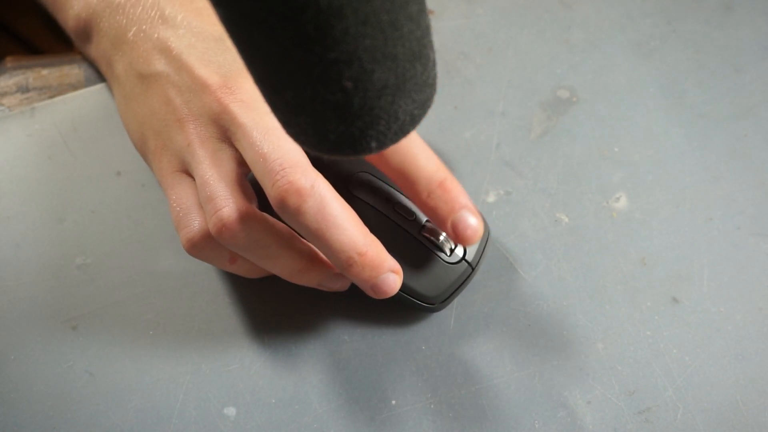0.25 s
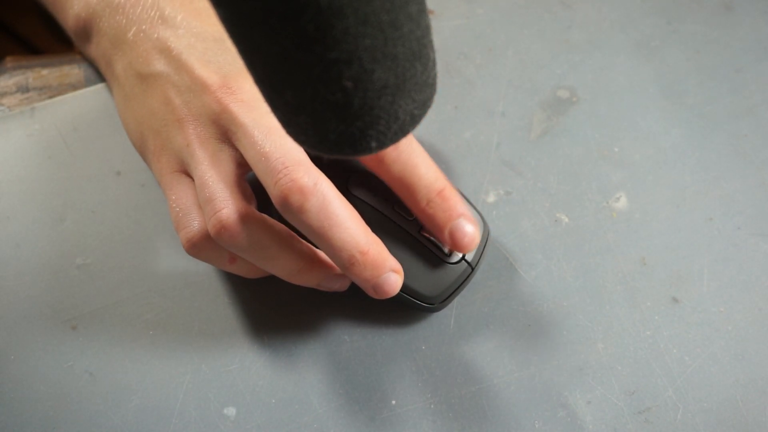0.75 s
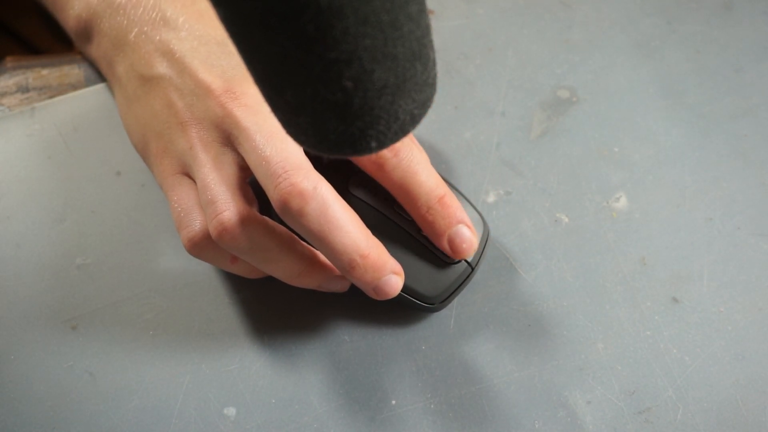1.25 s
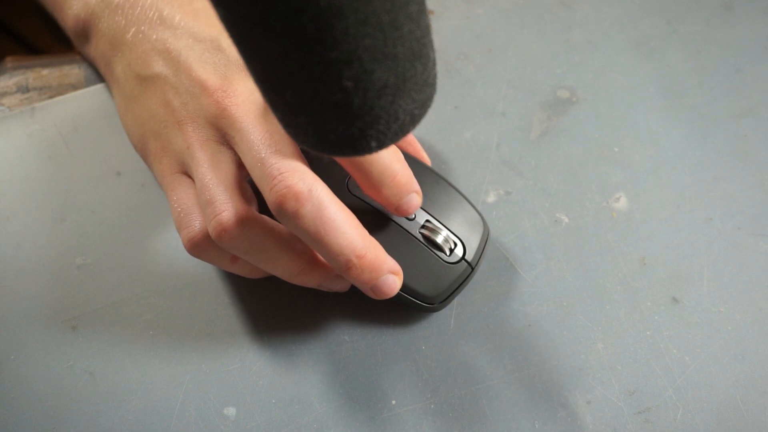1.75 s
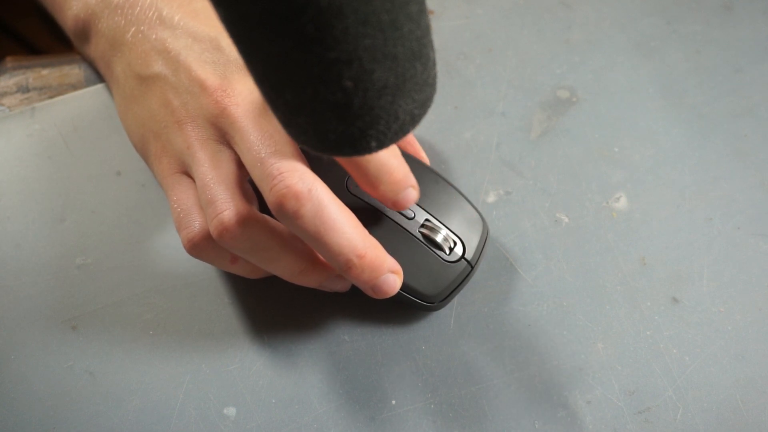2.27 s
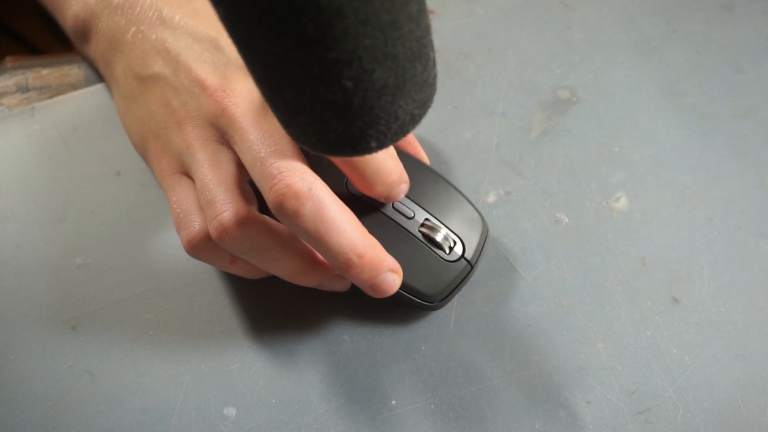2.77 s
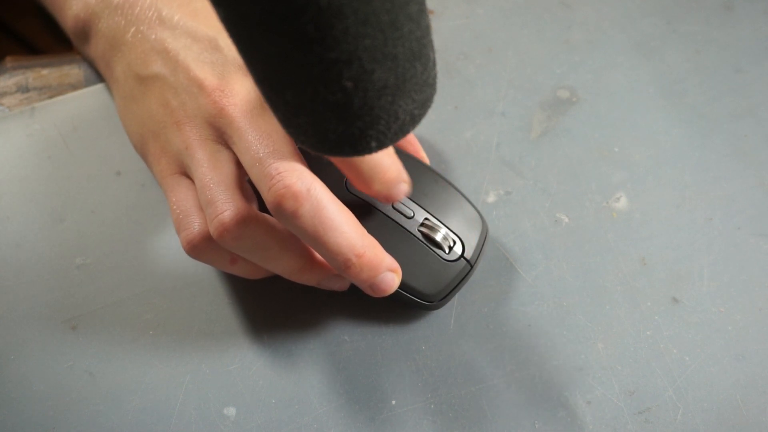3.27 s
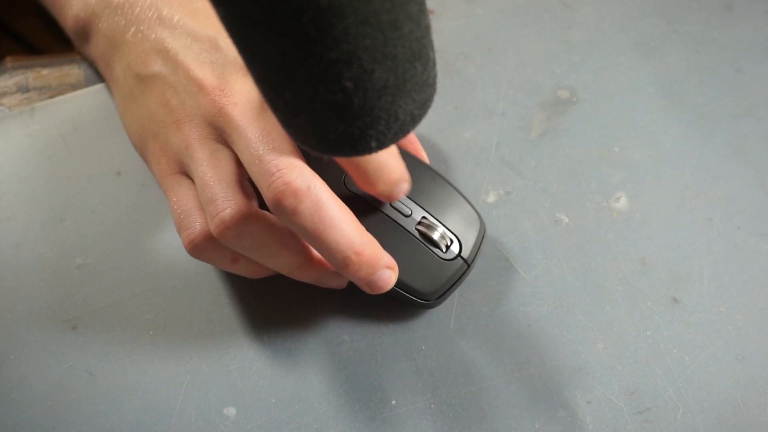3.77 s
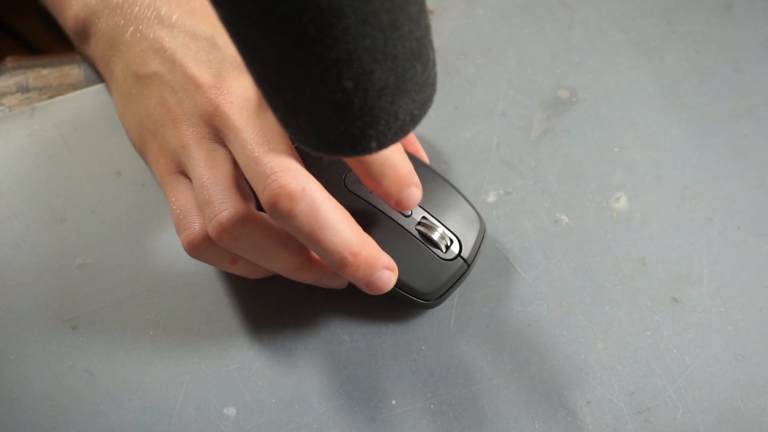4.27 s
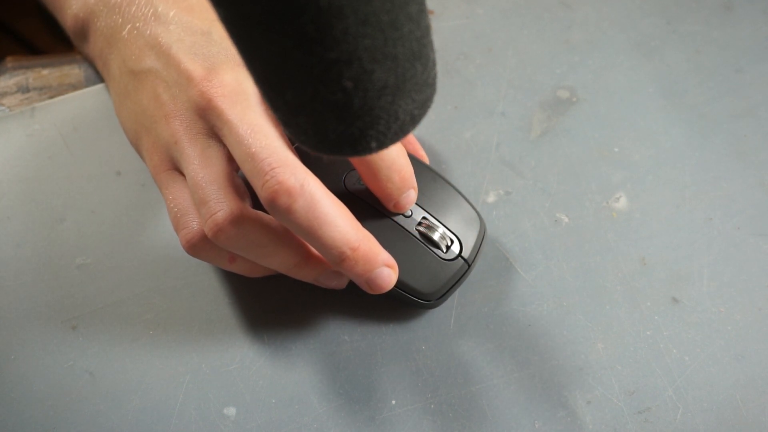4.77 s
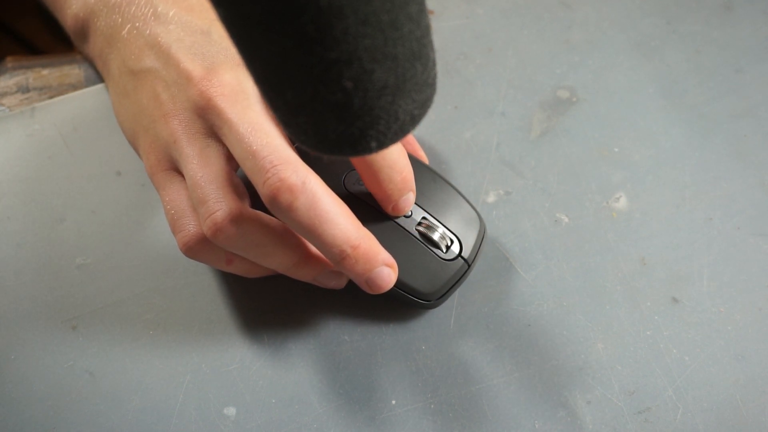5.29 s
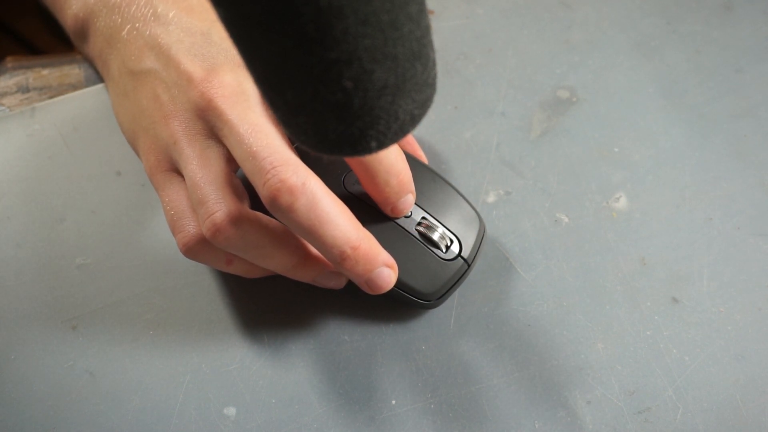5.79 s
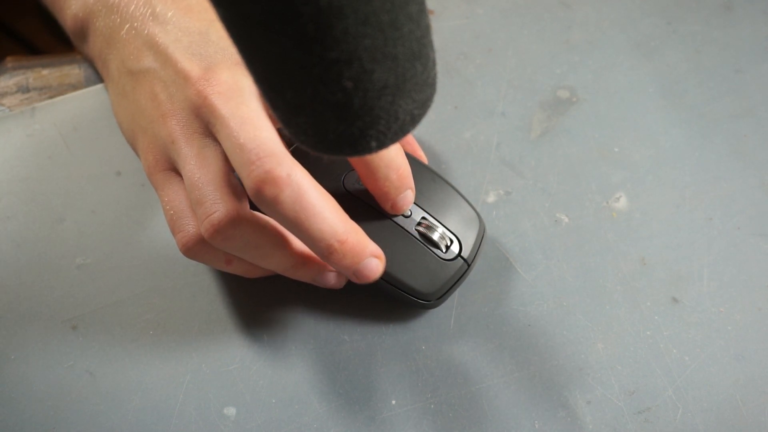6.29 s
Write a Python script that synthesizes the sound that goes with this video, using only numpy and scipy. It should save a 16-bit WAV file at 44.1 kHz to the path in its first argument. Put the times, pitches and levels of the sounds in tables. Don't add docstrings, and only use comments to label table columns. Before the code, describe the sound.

Fingers rustle and tap a plastic mouse on a hollow desk, wheel faintly squeaks, then five crisp button clicks, heard very close.

```python
import sys
import numpy as np
from scipy import signal
from scipy.fft import rfft, irfft
from scipy.io import wavfile
from scipy.ndimage import uniform_filter1d

SR = 44100
rng = np.random.default_rng(int(sys.argv[2]) if len(sys.argv) > 2 else 0)


def ratio(d):
    e = np.asarray(d, float) / 20
    return 10 ** e


def wrap_up_sound(samples):
    columns = np.atleast_2d(samples).T
    tamed = np.clip(columns, -1, 1)
    steps = np.round(tamed * 32767).astype(np.int16)
    wavfile.write(sys.argv[1], SR, steps)


N = 288414

# t/s, snap level/dB
CLICKS = [
    (4.6847, -32.5),
    (5.1499, -32.5),
    (5.521, -33),
    (5.8341, -34.5),
    (6.4042, -33),
]
# t/s, thud level/dB
RELEASES = [
    (4.8342, -30.5),
    (5.309, -30.5),
    (5.618, -30),
    (5.9395, -30),
]
# f/Hz, level/dB, t60/s
LEAF = [(4940, 13.5, 0.0076), (4560, -9, 0.022), (5156, 2, 0.015), (6430, -4, 0.013), (2820, -16, 0.029),
        (3800, -43, 0.024), (2050, -8.5, 0.01), (6350, -15, 0.0054)]
LEAF_SCATTER_DB = 1.5


def clock(seconds):
    return np.arange(int(seconds * SR)) / SR


def decay(t, t60):
    return np.exp(-np.log(1000) * t / t60)


def band(x, hz, width):
    return signal.lfilter(*signal.iirpeak(hz, hz / width, fs=SR), x)


def twice_band(x, hz, width):
    return band(band(x, hz, width), hz, width)


def unit(x):
    return x / np.abs(x).max()


def add(track, s, sound):
    i = int(s * SR)
    track[i:i + len(sound)] += sound[:N - i]


def ring(modes, chance, seconds, scatter_db, contact_ms, scale=1):
    t = clock(seconds)
    hz, db, t60 = np.transpose(modes)[:, :, None]
    db = db + scatter_db * chance[:len(modes), None]
    free = (ratio(db) * np.sin(2 * np.pi * hz * scale * t) * decay(t, t60)).sum(axis=0)
    push = np.sin(np.linspace(0, np.pi, max(int(contact_ms * SR / 1000), 1) + 2))
    return unit(signal.fftconvolve(free, push)[:len(t)])


def crack(lo_hz, hi_hz, decay_ms, bounce_db):
    t = 1000 * clock(.025)
    shape = np.exp(-t / decay_ms) + ratio(bounce_db) * np.exp(-t / 3.74)
    colour = signal.butter(2, [lo_hz, hi_hz], "band", fs=SR, output="sos")
    return shape * signal.sosfilt(colour, rng.standard_normal(len(t)))


def glide(table):
    s, *columns = np.transpose(table)
    start, end = s[0], s[-1]
    t = np.arange(start, end, 1 / SR)
    from_edge = np.minimum(t - start + (start < 1e-3), end - t)
    edge = np.clip(from_edge / min(.01, (end - start) / 12), 0, 1)
    return start, edge, [np.interp(t, s, c) for c in columns]


def hiss():
    # f/Hz, level/dB per Hz
    spectrum = [(15, -32.5), (25, 4.5), (68, 3.5), (108, -7), (818, -28.5), (1230, -27.5), (1610, -31),
                (14800, -30.5), (16000, -37)]
    hz, db = np.transpose(spectrum)
    f = np.fft.rfftfreq(N, 1 / SR) + 1
    x = irfft(rfft(rng.standard_normal(N)) * ratio(np.interp(np.log(f), np.log(hz), db)), N)
    return ratio(-69) * x / x.std()


def skin_rub():
    # t/s, length/s, level/dB, shell share level/dB
    rubs = [
        (0.0, 0.022, -58.5, -33),
        (0.038, 0.052, -78, -20),
        (0.438, 0.14, -66, -38),
        (0.525, 0.035, -71, -27),
        (0.8, 0.049, -71.5, -28),
        (0.888, 0.063, -69.5, -33),
        (1.01, .04, -78, -22),
        (1.871, 0.16, -67, -22),
        (4.266, 0.099, -72.5, -26),
    ]
    attack, start_db, fade_db = .3, 9, 14
    on_desk, on_shell = np.zeros(N), np.zeros(N)
    for s, seconds, db, shell_db in rubs:
        curve = [(s, db - start_db), (s + attack * seconds, db), (s + seconds, db - fade_db)]
        s, edge, (db,) = glide(curve)
        grain = edge * ratio(db) * rng.standard_normal(len(db))
        add(on_desk, s, grain)
        add(on_shell, s, grain * ratio(shell_db))
    dull = twice_band(on_desk, 170, 290)
    hollow = band(band(on_shell, 780, 700), 950, 560)
    return ratio(19) * dull + ratio(29.5) * hollow


def rocking():
    # peak t/s, level/dB, swell/s, t60/s
    swells = [
        (0.01, -38.5, .02, 0.39),
        (0.485, -39.5, 0.086, 0.25),
        (0.63, -59, 0.029, 0.37),
        (0.91, -41, .04, 0.14),
        (1.025, -55.5, 0.018, 0.39),
        (1.29, -61, 0.027, 0.04),
        (2.641, -54, 0.0414, 0.044),
    ]
    rock_hz, swell_db, hold_s = 58.5, 19.5, .04
    out = np.zeros(N)
    for s, db, swell, t60 in swells:
        start = max(s - swell, 0)
        curve = [(start, rock_hz, db - swell_db * (start > 0)), (s, rock_hz, db),
                 (s + hold_s, rock_hz, db - 4.0), (s + hold_s + t60 / 2, rock_hz, db - 31.5)]
        s, edge, (hz, db) = glide(curve)
        add(out, s, edge * ratio(db + 1.5) * np.sin(2 * np.pi * np.cumsum(hz) / SR))
    return out


def taps():
    # t/s, level/dB, f/Hz near the top of the band, length/ms
    nail_taps = [(0.046, -64, 4830, 5.4), (.159, -73, 2500, 1.5), (.54, -65.5, 4530, 2.5),
                 (0.659, -68, 1300, 1.5), (1.359, -70, 9000, 1.2), (1.384, -55, 2200, 3.7),
                 (2.192, -56, 2500, 4.5), (3.262, -53, 2070, 2.3), (4.434, -65, 3000, 1.3),
                 (4.457, -48.5, 3300, 0.64), (4.871, -61, 3220, 0.54), (4.872, -55.5, 1250, 2.9),
                 (5.206, -56, 2480, 1.2), (6.132, -66, 1350, 3.8), (6.268, -61, 2550, 1.9)]
    out = np.zeros(N)
    for s, db, hz, ms in nail_taps:
        add(out, s, ratio(db) * unit(crack(0.17 * hz, 1.1 * hz, 0.84 * ms, -14)))
    return out


def blows():
    # t/s, thud level/dB, boom level/dB, panel level/dB
    pushes = [(0.151, -56.5, -64, -60.5), (0.343, -61, -48.5, -68), (0.649, -51.5, -65, -62.5),
              (0.817, -68, -42.5, -58), (1.34, -50, -54, -56), (2.011, -31.5, -35.5, -37.5),
              (2.158, -48, -58, -38.5), (2.668, -46, -48, -41), (3.13, -42, -46.5, -40),
              (3.146, -59, -66, -38.5), (3.631, -36, -43, -47.5), (4.408, -51.5, -49, -57),
              (6.455, -42, -62, -48.5)]
    # t/s, thud level/dB, boom level/dB, panel level/dB
    jolts = [(0.994, -56, -68, -72), (1.321, -49, -68, -40.5), (1.345, -50, -57, -40.5),
             (1.871, -51.5, -57, -50.5), (2.006, -54, -42, -53), (2.167, -25, -51, -41),
             (2.173, -33, -64, -34.5), (2.19, -56, -65, -42.5), (3.552, -46, -41, -48),
             (3.604, -38, -68, -51), (4.238, -43.5, -65, -41.5), (4.243, -42.5, -55.5, -57),
             (5.201, -40, -55, -47.5), (6.268, -41, -53.5, -56.5)]
    # t/s, thud level/dB, boom level/dB, panel level/dB, contact/ms
    landings = [
        (1.3343, -28, -56, -40, 1.36),
        (1.3385, -29, -56, -52, 1.4),
        (3.1148, -26, -31, -43.5, 4.5),
    ]
    # t/s, thud level/dB, boom level/dB, panel level/dB
    lifts = [
        (2.674, -37, -44.5, -52),
        (3.12, -21.5, -35, -34),
        (3.593, -39, -39, -41.5),
        (3.954, -41.5, -43.5, -48.5),
    ]
    # panel tilt in dB per octave, contact in ms
    push_touch, jolt_touch, lift_touch = (-5.5, 2.85), (5.3, 3.23), (4.5, 2)
    click_touch, release_touch = (-1.4, 2.48), (-5, 2.7)
    landing_tilt_db = 1
    down, up = 0.98, -1.156
    rows = [(down, *row, *push_touch) for row in pushes]
    rows += [(down, *row, *jolt_touch) for row in jolts]
    rows += [(down, *row, landing_tilt_db, ms) for *row, ms in landings]
    rows += [(up, *row, *lift_touch) for row in lifts]
    rows += [(up, s, db + 2.5, db - 17.5, db - 8, *click_touch) for s, db in CLICKS]
    rows += [(up, s, db, db - 14.5, db - 9.5, *release_touch) for s, db in RELEASES]
    return rows


def tilted(modes, db_per_octave):
    return [(hz, db + db_per_octave * np.log2(hz / 200), t60) for hz, db, t60 in modes]


def desk():
    # f/Hz, level/dB, t60/s
    boom_modes = [(61, -5, 0.12), (58.4, -2, 0.41), (51.37, -9.5, 0.6), (70, -12.5, .12)]
    # f/Hz, level/dB, t60/s
    panel_modes = [(120, -0.5, 0.2), (151.4, -3.5, 0.31), (218.7, -4, 0.16), (258, -10.5, 0.29),
                   (295, -3.5, 0.18), (324, -10.5, 0.22), (423, 1.5, 0.084), (503, -9.5, 0.051),
                   (623, -43, 0.35), (780, -12, 0.082)]
    thud_modes = [(177, 3.5, 0.017), (359, -4.0, 0.0085)]
    out, t = np.zeros(N), clock(.35)
    wood = signal.butter(3, [110, 700], "band", fs=SR, output="sos")
    bass_cut = signal.butter(2, 45, "high", fs=SR, output="sos")
    every_blow = blows()
    chance = rng.standard_normal((len(every_blow), 11))
    for (sign, s, thud_db, boom_db, panel_db, tilt_db, ms), c in zip(every_blow, chance):
        thud = signal.sosfilt(bass_cut, ring(thud_modes, c, .06, 5.9, ms))
        boom = ring(boom_modes, c, 0.58, 0.99, ms, 1 + .02 * c[-1])
        panel = ring(tilted(panel_modes, tilt_db), c, .35, 1.13, 0.89 * ms, 1 + 0.021 * c[-1])
        rattle = unit(signal.sosfilt(wood, rng.standard_normal(len(t))) * decay(t, 0.25))
        add(out, s, sign * ratio(thud_db) * thud)
        add(out, s, sign * ratio(boom_db + 3) * boom)
        add(out, s + .003, sign * ratio(panel_db) * (panel + ratio(tilt_db - 21.5) * rattle))
    return out


def stroke(s, seconds, hz, rough, back, slow_hz, fade_db):
    slowing_s = .024
    rows = []
    for u in np.linspace(0, seconds, num=9):
        slip_hz = slow_hz + (hz - slow_hz) * np.exp(-(u / slowing_s) ** 2)
        rows.append((s + u, slip_hz, -fade_db * (u / seconds) ** 2, rough, back))
    return rows


def wheel_squeak():
    # t/s, length/s, pressure level/dB, first slip rate f/Hz
    squeaks = [
        (0.931, 0.084, -90, 1200),
        (2.568, .053, -86, 1300),
        (2.676, 0.052, -65.5, 1250),
        (3.6, 0.02, -65.5, 1230),
        (3.953, 0.065, -67, 1420),
    ]
    # roughness 0-1, back-slip share 0-1, final slip rate f/Hz, fade level/dB
    grips = [(.15, 0, 1240, 5), (.5, 0, 1250, 7), (.36, .7, 1300, 20), (.5, .4, 1100, 20), (.18, 0, 620, 8)]
    # f/Hz, width f/Hz, level/dB
    wheel_modes = [(1250, 174, -1), (3350, 700, -7), (4920, 410, -0.5), (6480, 560, -6), (8450, 840, -8.5),
                   (11830, 460, -7.5)]
    slips = np.zeros(N)
    for (s, seconds, press_db, first_hz), hold in zip(squeaks, grips):
        s, edge, (hz, db, rough, back) = glide(stroke(s, seconds, first_hz, *hold))
        wobble = uniform_filter1d(rng.standard_normal(len(hz)), size=40)
        cycle = np.cumsum(hz * (1 + 1.6 * rough * wobble)) / SR
        pulses = np.exp(-(cycle % 1) / 0.027) - back * np.exp(-((cycle + .5) % 1) / 0.017)
        grip = ratio(19 * uniform_filter1d(rng.standard_normal(len(hz)), size=150))
        scrape = 1.24 * rough * rng.standard_normal(len(hz))
        add(slips, s, edge * ratio(db + press_db) * grip * (6 * pulses + scrape))
    wheel = np.zeros(N)
    for k, (hz, width, db) in enumerate(wheel_modes):
        wheel += (-1) ** k * ratio(db) * band(slips, hz, width)
    return ratio(16.0) * wheel


def snaps():
    # t/s, snap level/dB, shell level/dB, shell f/Hz
    contacts = [
        (1.3352, -34, -44, 920),
        (1.3394, -31.5, -43.5, 1238),
        (2.178, -46.5, -52.5, 1180),
        (2.6685, -49.5, -53.5, 1050),
        (2.6765, -46.5, -57, 1160),
        (3.1192, -27, -38.5, 1111),
        (3.148, -63, -60, 1120),
        (3.5926, -45, -50.5, 1126),
        (4.4093, -55.5, -66.5, 1140),
        (6.2695, -58, -61, 1020),
    ]
    rows = [(s, db, shell_db, hz, db - 22.5, -15) for s, db, shell_db, hz in contacts]
    rows += [(s, db, db - 20.5, 1154, db - 26.5, -6.5) for s, db in CLICKS]
    return rows


def after_ring(t60):
    # f/Hz, width f/Hz, level/dB
    hollows = [(1250, 370, 2.5), (2490, 820, -3.5), (5180, 620, -19)]
    t = clock(.25)
    buzz = rng.standard_normal(len(t)) * decay(t, t60)
    return unit(sum(ratio(db) * twice_band(buzz, hz, width) for hz, width, db in hollows))


def switch_snaps():
    # ratio to the main ring, level/dB, t60/s
    shell_modes = [(1, 20.5, 0.034), (1.077, 13, 0.042), (0.836, 4, 0.033), (1.3, 1, 0.039),
                   (0.36, -56, 0.13)]
    out = np.zeros(N)
    every_snap = snaps()
    chance = rng.standard_normal((len(every_snap), 8))
    for (s, db, shell_db, hz, crack_db, bounce_db), c in zip(every_snap, chance):
        add(out, s, ratio(db) * ring(LEAF, c, .05, LEAF_SCATTER_DB, .06))
        add(out, s + 0.00199, ratio(shell_db - 18.5) * after_ring(0.39))
        add(out, s, ratio(shell_db + 10) * ring(shell_modes, c, 0.24, 3.3, 0.15, hz))
        add(out, s, ratio(shell_db) * crack(1730, 2970, 0.44, 5.8))
        add(out, s, ratio(crack_db + 12) * crack(4900, 12200, 0.67, bounce_db))
    return out


def wobbles():
    # t/s, f/Hz, level/dB, t60/s
    lone_rings = [(1.343, 197, -54, .36), (1.345, 253, -49, .42), (1.345, 524, -58, .2),
                  (1.345, 2620, -68, .5), (2.11, 350, -57.5, .11), (2.18, 325, -47.5, .36),
                  (2.18, 620, -57, .33), (2.181, 502, -57, .08), (3.125, 420, -52, .3),
                  (3.125, 2600, -66, .3), (4.108, 474, -63.5, .05), (6.268, 2520, -65, .02),
                  (6.458, 430, -59.5, .07)]
    out, t = np.zeros(N), clock(.35)
    for s, hz, db, t60 in lone_rings:
        kicks = rng.standard_normal(len(t)) * decay(t, t60)
        rough = unit(twice_band(kicks, hz, min(0.25 * hz, 130)))
        clean = ring([(hz, 0, 0.54 * t60)], np.zeros(1), .35, 0, 1.14)
        add(out, s, ratio(db) * (rough + ratio(1.5) * clean))
    return out


def button_ticks():
    # t/s, leaf level/dB, shell level/dB, crack level/dB
    ticks = [
        (1.3963, -53, -54.5, -61),
        (2.1016, -38, -52.5, -58.5),
        (2.2304, -54, -51.5, -59),
        (3.6046, -56, -74, -65),
        (4.1074, -46, -55.5, -62.5),
        (4.736, -54, -53.5, -61),
        (5.199, -63, -48.5, -60.5),
        (5.8828, -50, -53, -60.5),
        (6.4548, -58, -48.5, -60.5),
    ]
    # ratio to the main ring, level/dB, t60/s
    button_modes = [(0.993, 0, .028), (1.064, -1.5, 0.025), (1.41, -22.5, 0.031), (0.762, -13, 0.032),
                    (0.93, -31, 0.24)]
    main_hz = 1242.5
    out = np.zeros(N)
    for (s, db, shell_db, crack_db), c in zip(ticks, rng.standard_normal((len(ticks), 8))):
        add(out, s, ratio(db - 8) * ring(LEAF, c, .05, LEAF_SCATTER_DB, .05))
        first = ring(button_modes[:1], c, .2, 0, 0.27, main_hz)
        others = ring(button_modes[1:], c, .2, 0.71, 0.24, main_hz)
        add(out, s, ratio(shell_db + 8.0) * unit(first - others))
        add(out, s, ratio(crack_db + 10.5) * crack(2860, 10600, 0.92, -12))
    return out


def shell_knocks():
    # t/s, shell level/dB, shell f/Hz
    knocks = [
        (2.015, -56.5, 1130),
        (2.188, -46, 1120),
        (2.195, -46, 1240),
        (3.108, -59, 1140),
        (3.55, -62, 1160),
        (3.63, -51, 1230),
        (4.242, -46, 1126),
        (4.966, -64.5, 1190),
    ]
    # ratio to the main ring, level/dB, t60/s
    cushioned = [(1.017, 3.5, 0.052), (0.903, -2.5, 0.043), (1.09, 8, 0.033), (0.89, -30, 0.6)]
    lag_s = 0.00242
    every_knock = knocks + [(s + lag_s, db - 14.5, 1114) for s, db in RELEASES]
    out = np.zeros(N)
    for (s, db, hz), c in zip(every_knock, rng.standard_normal((len(every_knock), 8))):
        add(out, s, ratio(db) * ring(cushioned, c, 0.16, 1.5, 0.76, hz))
    return out


def room(x):
    t60_s, level_db = 0.53, -33.5
    t = clock(.4)
    echoes = rng.standard_normal(len(t)) * decay(t, t60_s) * (t > .004)
    echoes = signal.lfilter(*signal.butter(2, 1700, fs=SR), echoes)
    return ratio(level_db) * signal.fftconvolve(x, echoes / np.linalg.norm(echoes))[:N]


def scene():
    finger = skin_rub() + wheel_squeak()
    mouse = taps() + switch_snaps() + button_ticks() + shell_knocks()
    near = finger + mouse
    top = rocking() + desk() + wobbles()
    return (near + room(near) + top + hiss())[None]


def band_limit(x):
    return signal.sosfilt(signal.butter(12, 16410, fs=SR, output="sos"), x)


def record(dry):
    mic = signal.sosfilt(signal.butter(2, 36, "high", fs=SR, output="sos"), dry)
    return band_limit(mic)


dry = scene()
out = record(dry)
wrap_up_sound(out)
```